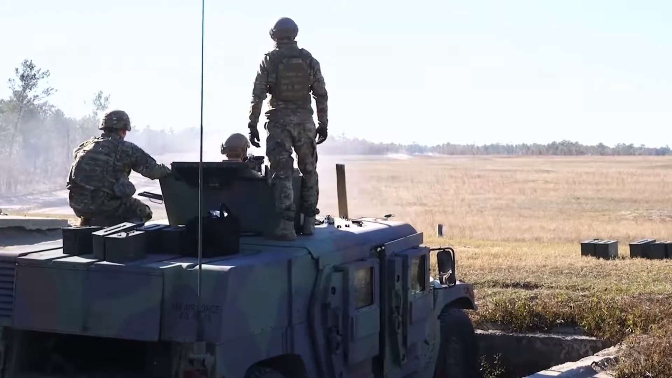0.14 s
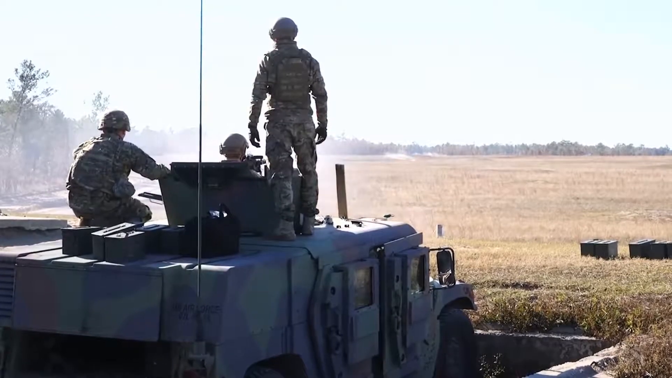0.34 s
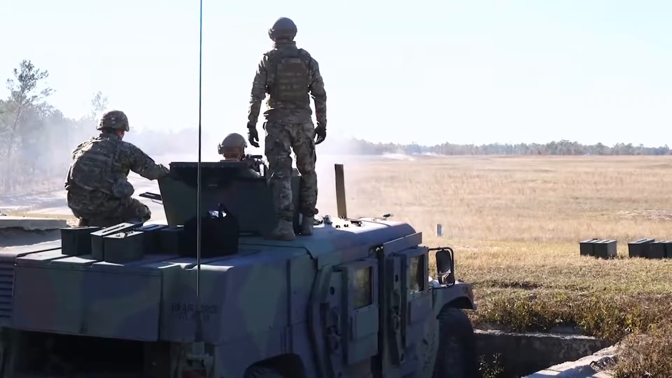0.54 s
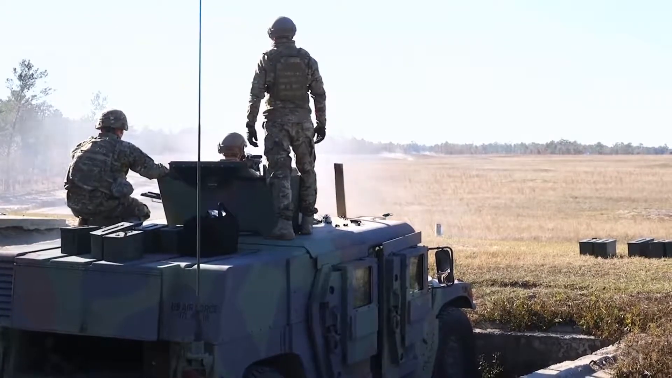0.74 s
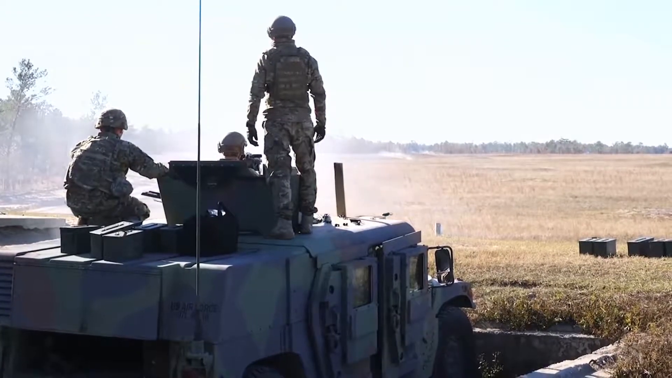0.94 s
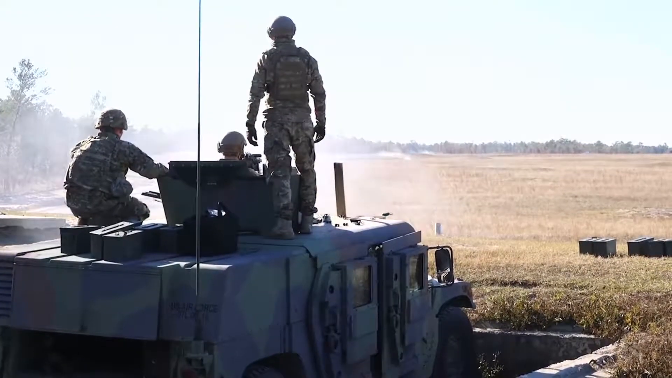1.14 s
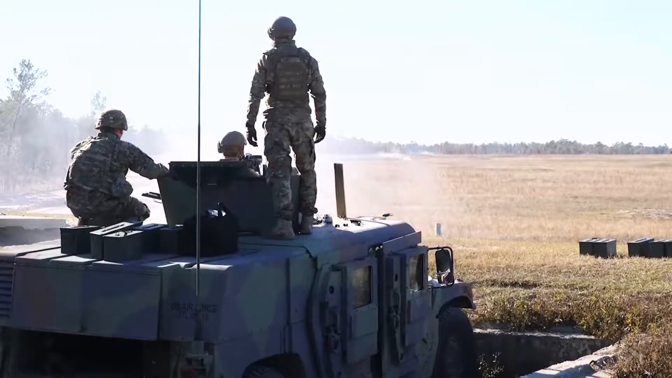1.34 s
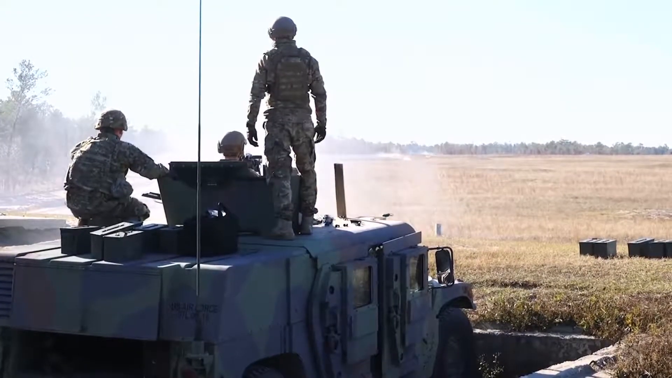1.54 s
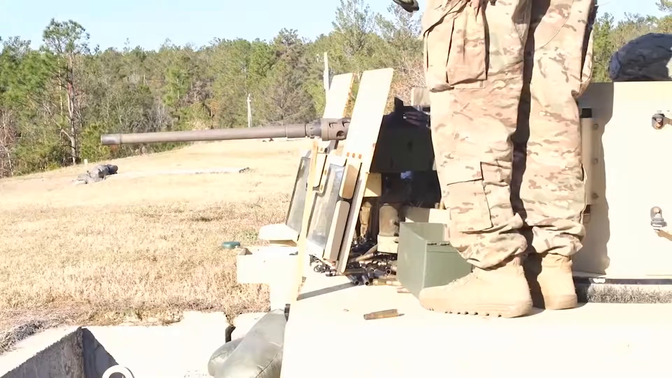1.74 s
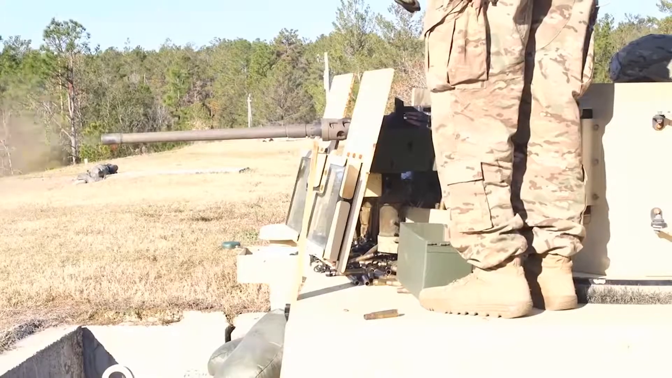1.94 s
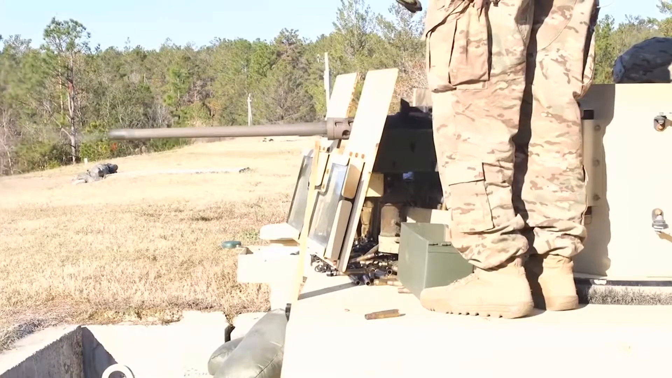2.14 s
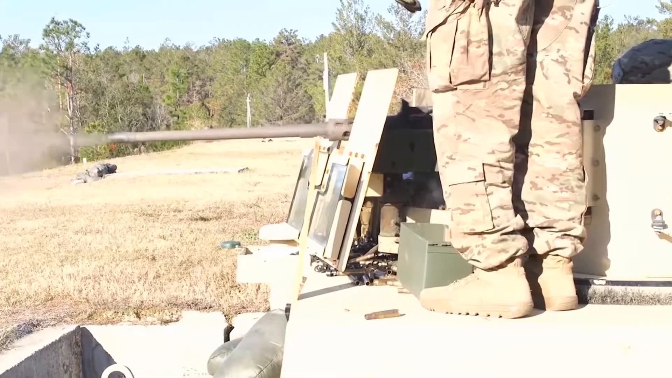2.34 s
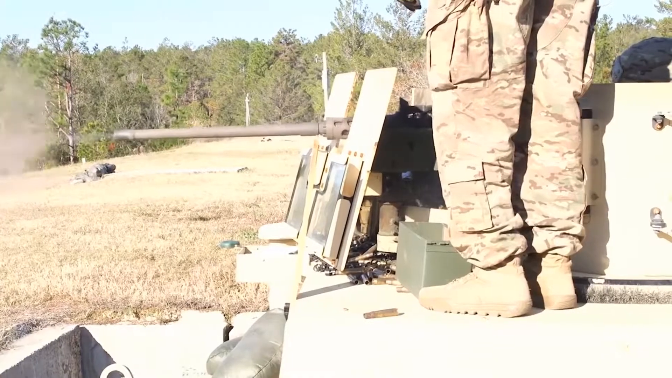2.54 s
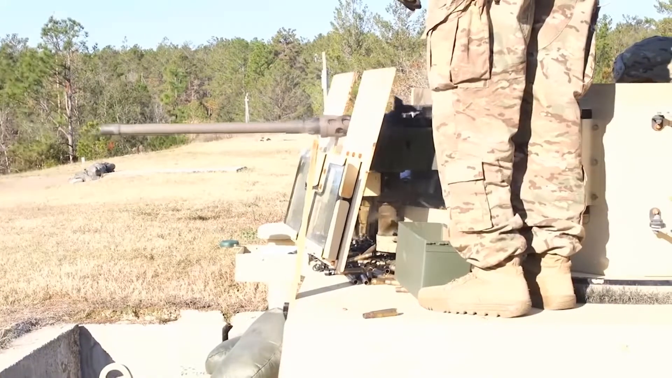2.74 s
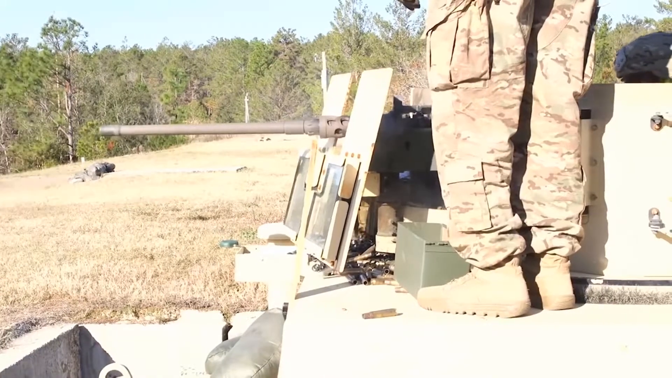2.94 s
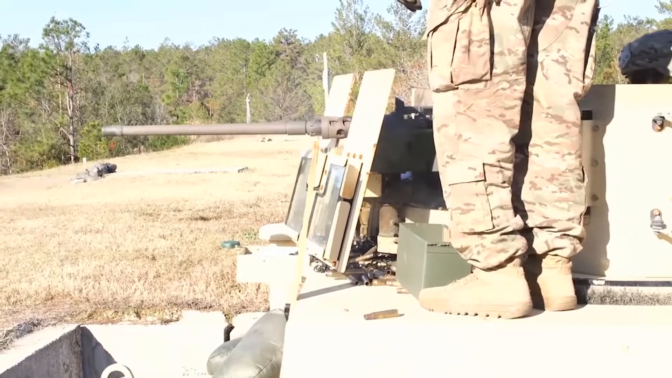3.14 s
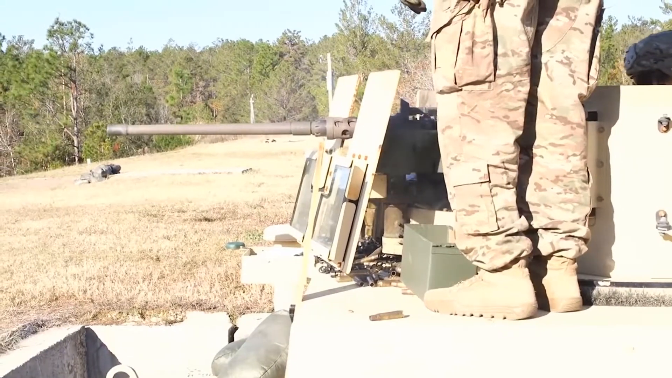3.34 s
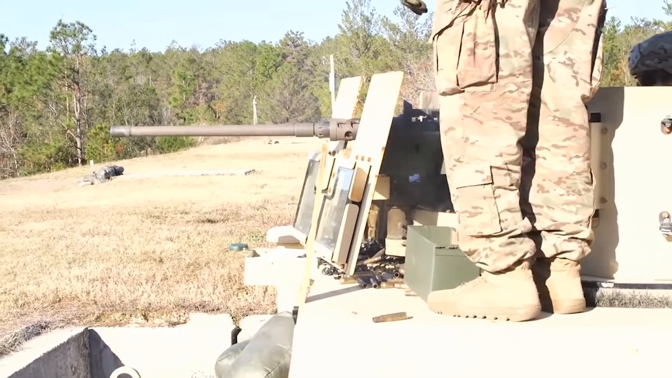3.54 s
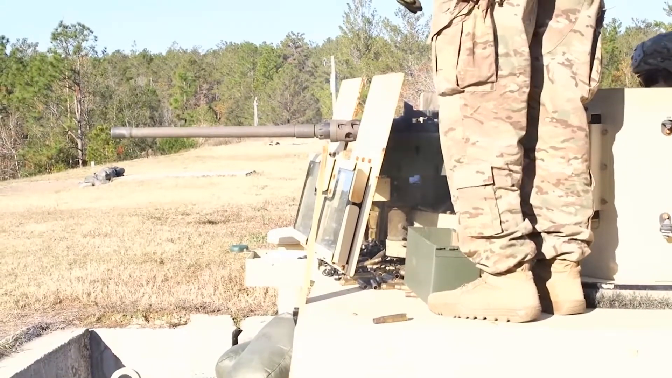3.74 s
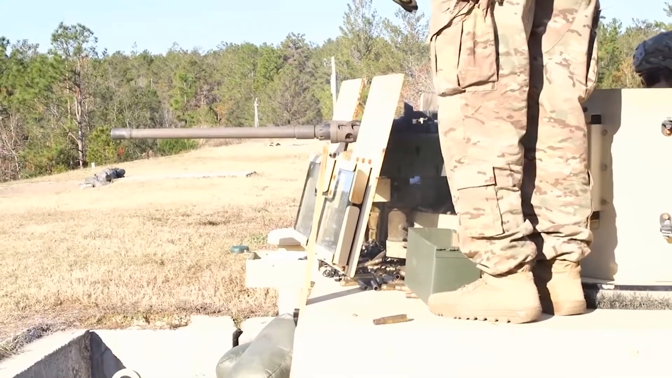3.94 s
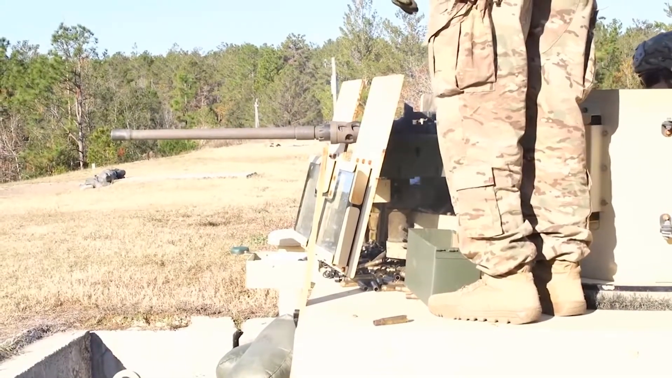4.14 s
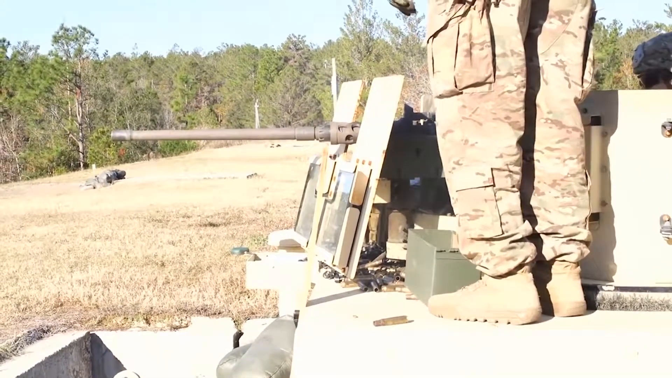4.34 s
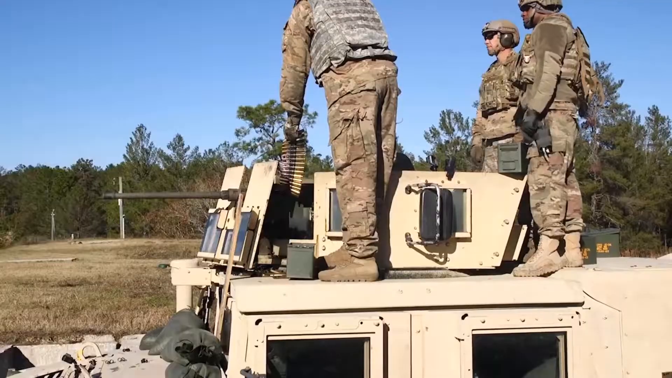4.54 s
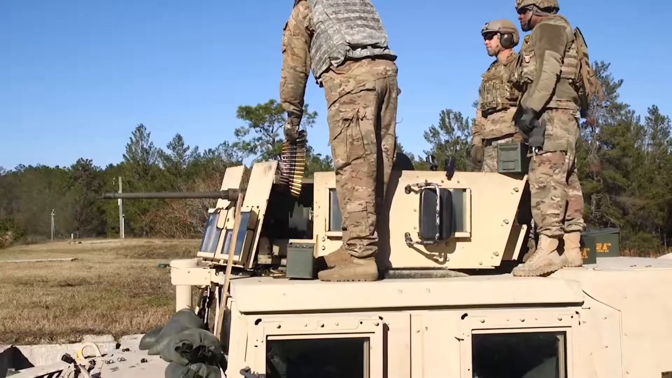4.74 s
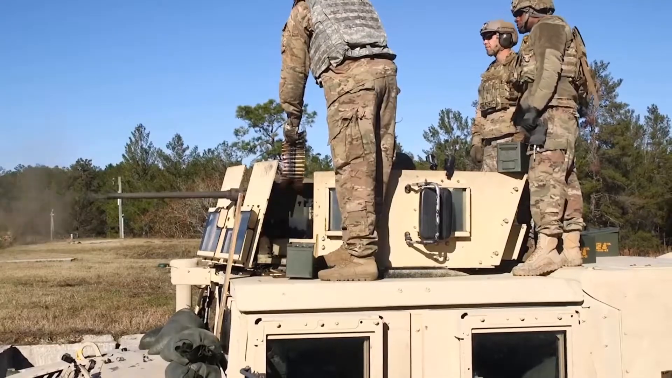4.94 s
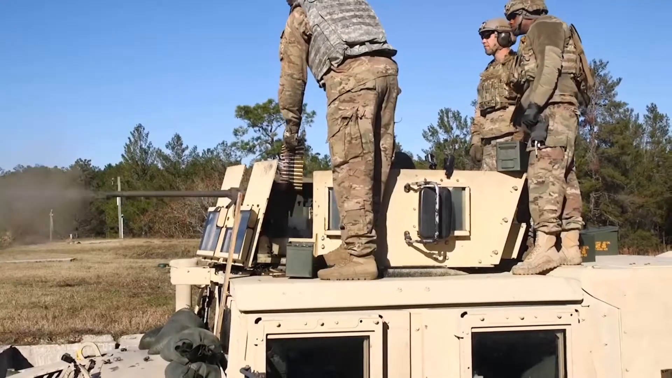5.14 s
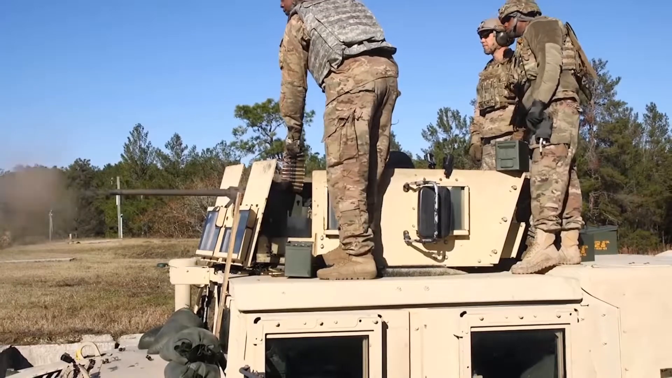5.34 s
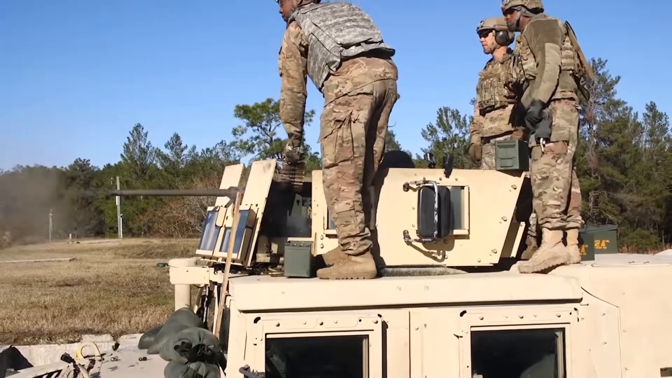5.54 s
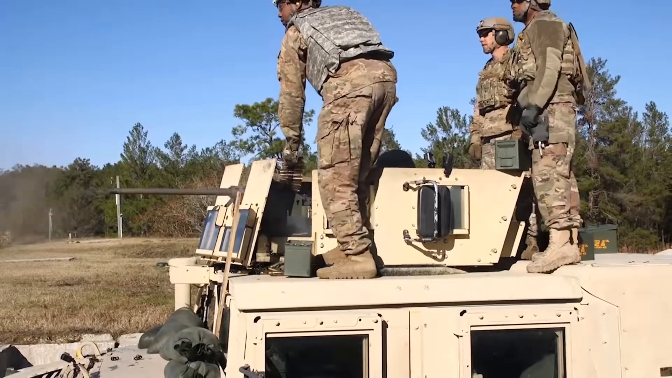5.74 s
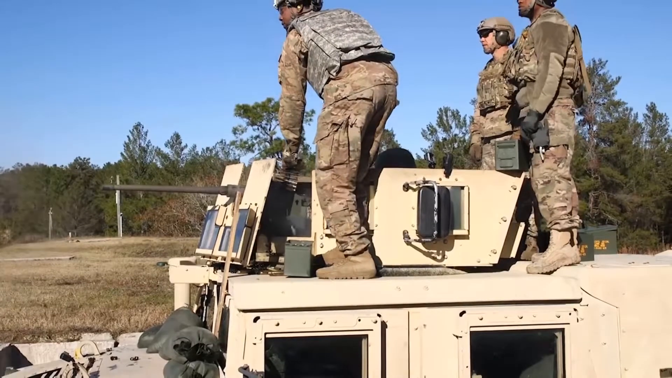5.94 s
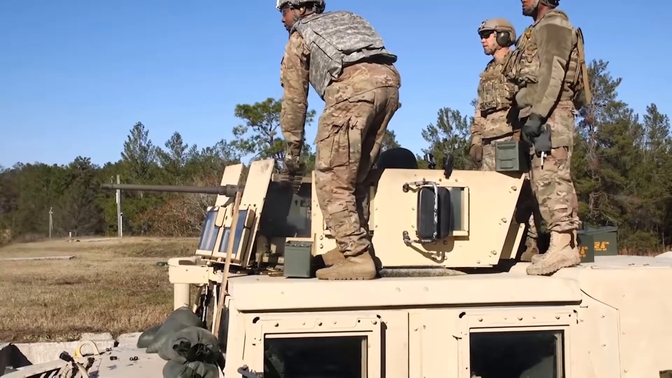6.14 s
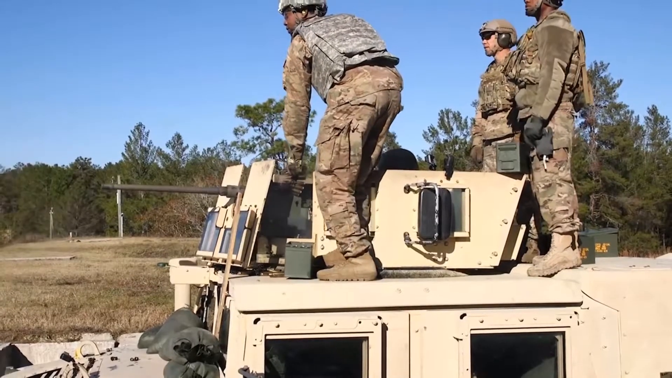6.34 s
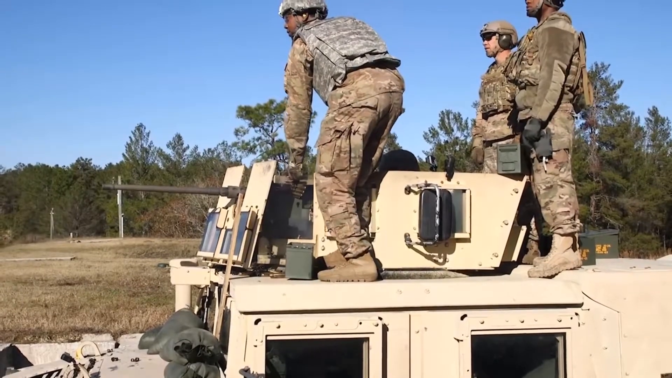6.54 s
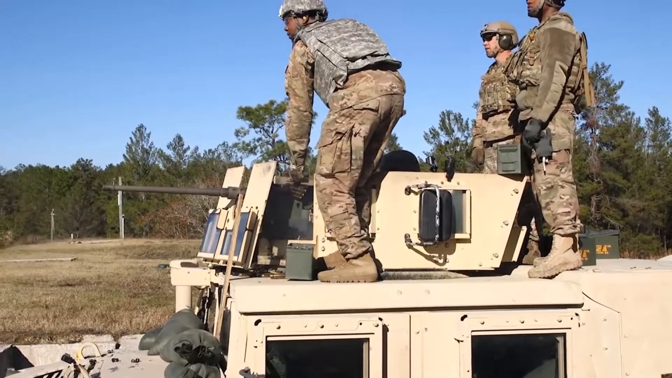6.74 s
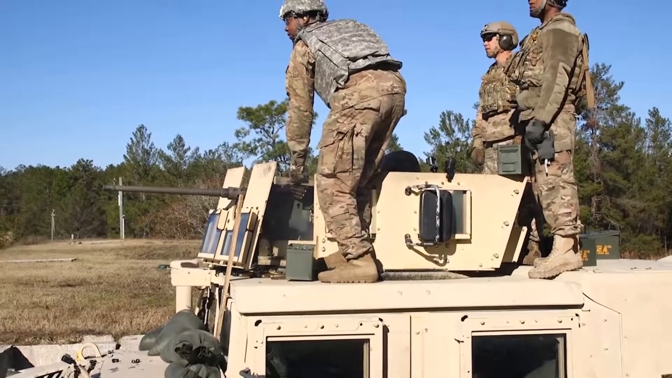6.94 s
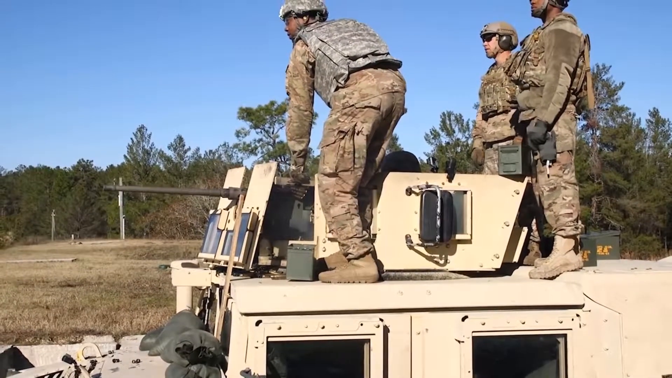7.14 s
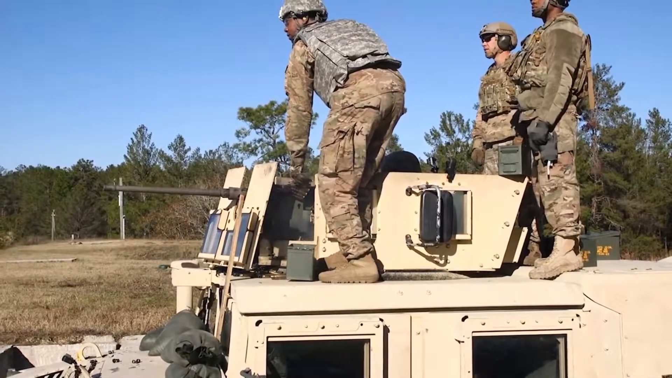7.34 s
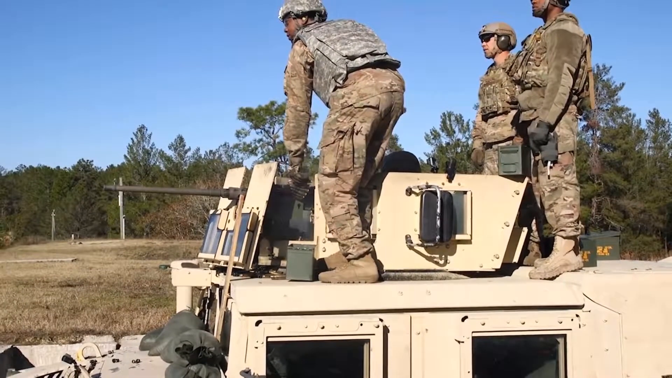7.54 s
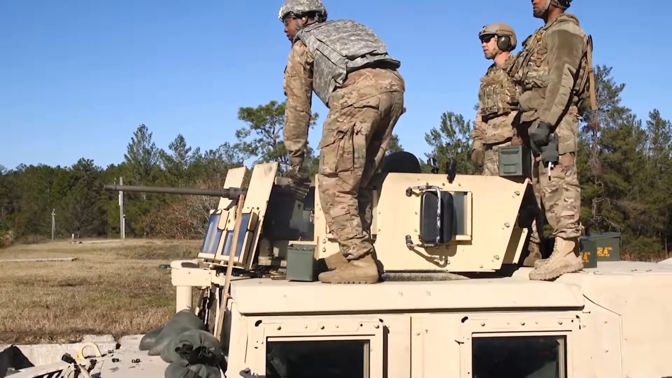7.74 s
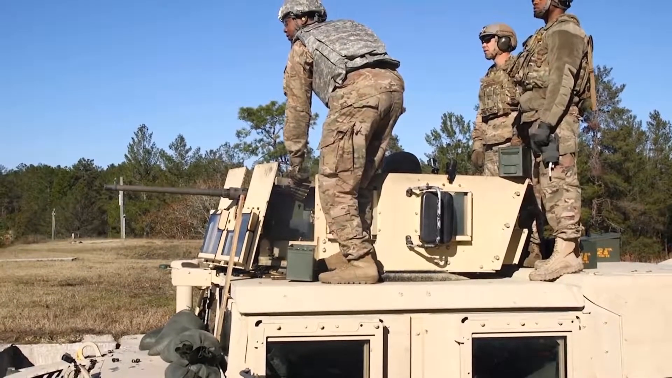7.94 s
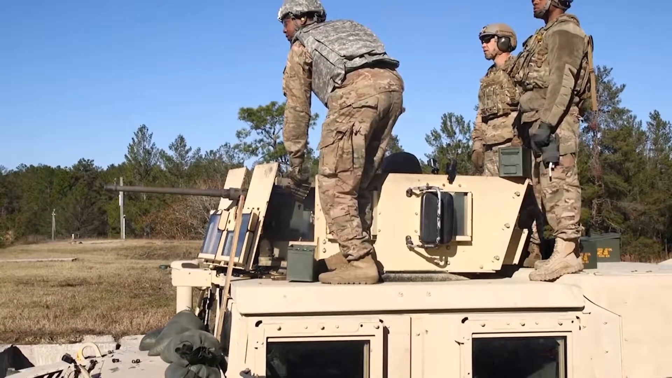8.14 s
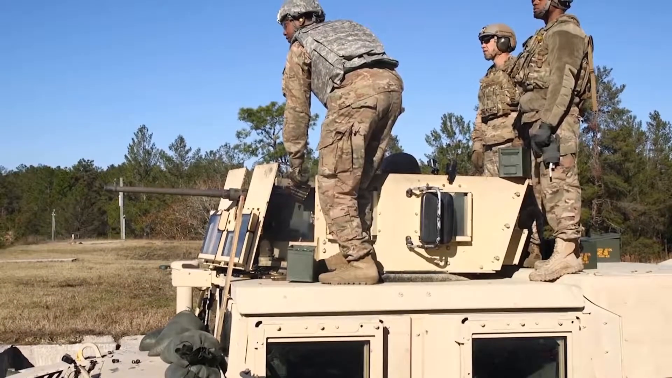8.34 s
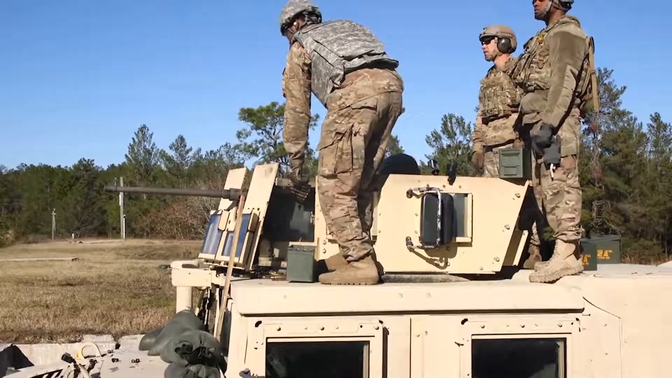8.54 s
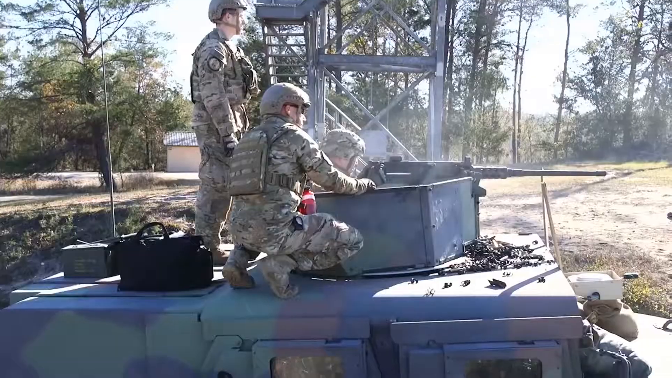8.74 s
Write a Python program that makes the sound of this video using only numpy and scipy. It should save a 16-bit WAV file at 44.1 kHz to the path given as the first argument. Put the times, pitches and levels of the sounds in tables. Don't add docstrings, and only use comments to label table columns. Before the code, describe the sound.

Four overloaded heavy machine-gun bursts on an open range, echoes rolling off trees, with links sliding and brass cases ringing on a steel roof between.

```python
import sys
import numpy as np
from scipy import signal
from scipy.fft import rfft, irfft, next_fast_len
from scipy.io import wavfile
from scipy.ndimage import uniform_filter1d

SR = 44100
rng = np.random.default_rng(int(sys.argv[2]) if len(sys.argv) > 2 else 0)


def master_out(mix):
    frames = np.transpose(np.atleast_2d(mix))
    ceiling = np.clip(frames, -1, 1)
    pcm = np.round(ceiling * 32767).astype(np.int16)
    wavfile.write(sys.argv[1], SR, pcm)


def field_ratio(decibels):
    return 10 ** (np.asarray(decibels, dtype=float) / 20)


N = 391608
STEP = 16
EDGES = 22 * 2 ** np.arange(0, 9.6, .5)

# start in seconds, end in seconds.
SPOT_TIMES = [
    (-.32, 1.739),
    (1.75, 4.473),
    (4.478, 7.467),
    (7.478, 8.668),
]


def at_hz(points, hz):
    table = np.array(points)
    return np.interp(np.log(hz), np.log(table[:, 0]), table[:, 1])


def one_pole(x, steps):
    return signal.lfilter([1], [1, -np.exp(-1 / max(steps, .01))], x + 1e-30)


def drift(count, steps):
    white = rng.standard_normal(count + 4000)
    slow = one_pole(one_pole(white, steps), steps)[4000:]
    return slow / slow.std()


def lowpass(x, hz):
    return signal.sosfilt(signal.butter(2, hz, fs=SR, output="sos"), x)


def bands(white):
    for k, (low, high) in enumerate(zip(EDGES, EDGES[1:])):
        band = signal.butter(2, [low, high], "band", fs=SR, output="sos")
        yield np.sqrt(low * high), signal.sosfilt(band, white[k % 2])


def stereo(mid, side, alike):
    return np.sqrt((1 + alike) / 2) * mid + np.sqrt((1 - alike) / 2) * side * [[1], [-1]]


def coloured(count, spectrum, alike):
    white = rng.standard_normal((2, 2, count))
    out = sum(field_ratio(at_hz(spectrum, hz)) * stereo(*noise, alike) for hz, noise in bands(white))
    return out / out.std()


def ring(clicks, hz, t60):
    r, w = field_ratio(-60 / (t60 * SR)), 2 * np.pi * hz / SR
    return signal.lfilter([0, np.sin(w)], [1, -2 * r * np.cos(w), r * r], clicks + 1e-18)


def boom(booms, count, alike):
    click = np.arange(count) == 0
    rings = []
    for delay_s, hz, level_db, t60 in booms:
        knock = field_ratio(level_db) * lowpass(ring(click, hz, t60), 2.53 * hz)
        rings.append(np.roll(knock, round(delay_s * SR)))
    rings = np.array(rings)
    mixed_signs = rings[::2].sum(axis=0) - rings[1::2].sum(axis=0)
    return stereo(rings.sum(axis=0), mixed_signs, -alike) * [[1], [-1]]


def arrivals(trains, paths, hz):
    power, rate = np.zeros(trains.shape), SR / STEP
    rise = 0.73 / hz * rate
    for delay_s, level_db, t60, centre_hz, narrowing_db in paths:
        lag, octaves = round(delay_s * rate), np.log2(hz / centre_hz)
        loss_db = 60 / t60 + 1.5 * (hz / 1000) ** 1.2
        fall = rate * 10 / np.log(10) / loss_db
        gain = field_ratio(2 * (level_db - abs(narrowing_db) * octaves ** 2))
        blur = 0.006 * lag + 1.2
        echo = one_pole(one_pole(trains, fall), blur) * (1 - np.exp(-1 / blur))
        power[:, lag:] += gain * echo[:, :power.shape[1] - lag]
    swelling = one_pole(power, rise) * (1 - np.exp(-1 / rise))
    return np.repeat(np.sqrt(swelling), STEP, axis=1)


def shaded(right, lead, bass_db, treble_db):
    size = next_fast_len(len(right))
    hz = np.arange(size // 2 + 1) * SR / size
    bass_loss_db = bass_db / (1 + (hz / 90) ** 2)
    treble_loss_db = treble_db / (1 + (9000 / (hz + 1)) ** 2)
    turn = np.exp(2j * np.pi * hz * lead / SR)
    return irfft(rfft(right, size) * field_ratio(-bass_loss_db - treble_loss_db) * turn, size)[:len(right)]


# frequency in Hz, share alike in every shot.
REPEATS = [(100, 0.96), (400, 0.85), (1200, 0.45), (4000, 0.34), (12000, .05)]
# frequency in Hz, share of the bass likeness left.
WIDENING = [(300, 0.81), (1400, 0.55), (3500, 0.13), (15000, .01)]
# frequency in Hz, level in dB per Hz.
GRIT = [(30, -10.5), (500, 0), (2000, -8), (6000, -7.5), (15000, -18)]
# overdrive left and right in dB, ceiling left and right in dB.
OVERLOAD = [(12.5, 2.5, -13, -25.5), (17.5, 6.5, -20.5, -18), (16.5, 8.5, -20.5, -20), (13, 4, -20, -16.5)]
# bass likeness left-right, grit in dB, lumpiness of the echo in dB.
SPACES = [(-.95, -11, 3), (-0.61, -5, 3), (-0.59, -5.5, 2), (0.087, -21, 1)]
# lead in samples, bass loss in dB, treble loss in dB.
RIGHT_SIDE = [(6.5, 2, 2.5), (9.0, 5.5, 2.5), (7.5, 5.5, 3), (-6.0, 1, 8.5)]
# delay in seconds, frequency in Hz, level in dB, t60 in seconds.
WALLS = [
    [(.139, 332, -8.5, 0.061), (.194, 415.6, -9.5, .04), (.254, 324, -10, 0.044), (.39, 288, -18.5, 0.063),
     (.438, 1610, -17.5, .004)],
    [(.185, 539, -13.5, 0.042), (.208, 460, -11.5, 0.055)],
    [(.176, 548, -11.5, 0.05), (.197, 496, -3.5, .045), (.17, 780, -19, 0.049), (.18, 430, -10.5, .05),
     (.088, 303, -5, 0.04)],
    [(.0755, 595, -18, 0.067), (.0755, 1164, -19.5, 0.044), (.203, 350, -25, 0.04), (.207, 900, -22, .02),
     (.26, 300, -26, .04), (.424, 300, -24, .03)],
]


def burst(spot, shots, paths, hulls, blast):
    start_s, end_s = SPOT_TIMES[spot]
    bass_alike, grit_db, lumpy_db = SPACES[spot]
    count = round((end_s - start_s) * SR) // STEP * STEP
    at = [round((s - start_s) * SR) for s, peak_db in shots]
    strength = field_ratio(.5 * (np.array(shots)[:, 1] + 14))
    trains = np.zeros((2, count // STEP))
    trains[0, 0] = 1
    trains[1, np.array(at) // STEP] = strength ** 2
    single, fresh, total = 0, 0, 0
    lumps = drift(count // STEP, 23.0)
    for hz, noise in bands(rng.standard_normal((2, 4, count))):
        gain, same = field_ratio(at_hz(blast, hz)), at_hz(REPEATS, hz)
        alike = bass_alike * at_hz(WIDENING, hz)
        one, many = gain * arrivals(trains, paths, hz)
        band_lumps = 0.97 * lumps + 0.6 * drift(count // STEP, 29.0)
        many = many * np.repeat(field_ratio(lumpy_db * band_lumps), STEP)
        single = single + np.sqrt(same) * one * stereo(noise[0], noise[1], alike)
        fresh = fresh + np.sqrt(1 - same) * many * stereo(noise[2], noise[3], alike)
        total += gain ** 2 * hz / SR
    single = single / np.sqrt(total) + boom(hulls + WALLS[spot], count, bass_alike)
    fresh = fresh / np.sqrt(total)
    for i, size in zip(at, strength):
        fresh[:, i:] += size * single[:, :count - i]

    drive, ceiling = field_ratio(np.reshape(OVERLOAD[spot], (2, 2, 1)))
    pressure = drive * fresh
    sound = ceiling * pressure / (1 + np.abs(pressure) ** 4.22) ** (1 / 4.27)
    excess = uniform_filter1d(np.tanh(.5 * np.abs(pressure)) ** 2, size=500, axis=1)
    sound = sound + ceiling * field_ratio(grit_db) * excess * coloured(count, GRIT, alike=0)
    sound = np.array([sound[0], shaded(sound[1], *RIGHT_SIDE[spot])])
    sound *= np.minimum(np.arange(count)[::-1] / 200, 1)
    out, first = np.zeros((2, N)), round(start_s * SR)
    out[:, max(first, 0):first + count] = sound[:, max(-first, 0):]
    return out


# time in seconds, peak in dB.
EARLIER_SHOTS = [(-.31, -16), (-.2, -22), (-.09, -10.5)]
SHOTS_1 = [(0.021, -15.5), (0.134, -14), (0.2424, -14.5), (0.3528, -19), (0.4614, -14.5), (0.5705, -15),
           (0.6801, -14.5), (0.7912, -15), (0.9061, -12.5), (1.0232, -15), (1.1392, -16.5), (1.2531, -17.5)]
# delay in seconds, level in dB, t60 in seconds, centre in Hz, narrowing in dB per squared octave.
PATHS_1 = [(0, 2, 0.058, 1960, -3), (0.017, 4.5, 0.092, 240, 2), (.024, -18, .088, 1321, 7.5),
           (.058, 0.54, 0.18, 382, 0.7), (.055, -15, .02, 6500, 1.5), (.139, -10.5, 0.15, 150, 5),
           (.193, -10.5, 0.18, 1200, 1.4), (.254, -14.5, 0.29, 269, 5), (.03, -19, 1.77, 1800, 2.5),
           (0.14, -21.5, 1.9, 167, 7)]
# delay in seconds, frequency in Hz, level in dB, t60 in seconds.
HULLS_1 = [(.012, 122, 2, 0.089), (.06, 333.3, -3, 0.18), (.062, 449.8, -2, 0.096), (.064, 569, -3, 0.07)]
# frequency in Hz, level in dB per Hz.
BLAST_1 = [(15, -46), (25, -31.5), (59, -16), (112, 0), (167, -12.5), (213, -1.5), (271, -0.5), (438, 1),
           (1120, -11), (5010, -24), (15000, -30.5)]


def first_burst():
    return burst(0, EARLIER_SHOTS + SHOTS_1, PATHS_1, HULLS_1, BLAST_1)


# time in seconds, level in dB, settling in seconds.
HEAPS = [(1.42, -50, 0.48), (2.801, -42, 0.11), (2.976, -49.5, .1), (5.87, -54, 0.12), (5.95, -61, 0.91)]


def heap_slides():
    t = np.arange(N) / SR
    return sum(field_ratio(level_db) * (t > s) * np.exp(-np.abs(t - s) / settle_s) for s, level_db, settle_s in HEAPS)


# frequency in Hz, level in dB.
LINKS = [
    [(5600, -84), (6700, -86), (7190, -82), (8200, -86), (8580, -90), (10430, -80), (10910, -82),
     (12355, -86), (12890, -92), (13830, -88), (14800, -90)],
    [(5980, -70), (6385, -68), (7180, -78), (8600, -74), (8760, -74), (10460, -77), (10700, -78),
     (11000, -78), (11340, -69), (11900, -76), (12380, -78), (12830, -79), (13830, -78), (14850, -79)],
    [(5630, -85), (6310, -80), (7190, -89), (8530, -88), (10450, -84), (10940, -87), (11220, -87),
     (12250, -90), (12830, -91), (13780, -88), (14100, -90)],
]
# start in seconds, end in seconds, left level in dB,
# right level in dB, t60 in seconds, spread of pitch as a share.
LINK_SPOTS = [(1.3, 1.739, 59, 41, .15, .005), (2.78, 4.473, 57, 50, .22, .007),
              (5.85, 7.467, 68, 61, .15, .009)]


def links(slides):
    out = np.zeros((2, N))
    touches_per_s = 77
    for modes, (start_s, until_s, left_db, right_db, t60, spread) in zip(LINKS, LINK_SPOTS):
        near = slice(round(start_s * SR), round(until_s * SR))
        count = near.stop - near.start
        for hz, mode_db in modes:
            lumps = field_ratio(3.6 * drift(count // 441 + 1, 12.0))
            lumps = np.repeat(lumps, 441)[:count]
            gains = field_ratio([[mode_db + left_db], [mode_db + right_db]])
            for off, sign in zip(rng.normal(1, spread, size=3), [1, -1, 1]):
                sizes = field_ratio(3.4 * np.minimum(rng.exponential(1, count), 3))
                touches = sizes * (rng.random(count) < touches_per_s / 3 / SR)
                out[:, near] += gains * [[1], [sign]] * ring(touches * lumps * slides[near], hz * off, t60)
        out[:, near] *= np.minimum(np.arange(count)[::-1] / 200, 1)
    return out


# start in seconds, end in seconds, level in dB, drift in dB
AIR = [
    (1.761, 2.024, -87, 7),
    (4.476, 4.831, -59, -13),
    (8.709, 8.88, -65, 9),
]
# frequency in Hz, level in dB per Hz.
AIR_COLOURS = [
    [(15, -30), (25, 3), (106, 3), (273, -16), (453, -3), (650, -10.5), (8000, -28.5), (10400, -49),
     (17600, -120)],
    [(15, -53), (25, -6), (242, -1), (536, -4.5), (590, -4), (682, -10), (980, -5), (8000, -57),
     (10400, -92), (17600, -120)],
    [(15, -34), (25, -19), (60, -7.5), (106, -30.5), (716, -42), (1970, -65.5), (8000, -73), (10400, -95.5),
     (17600, -120)],
]


def air():
    out = np.zeros((2, N))
    for (start_s, until_s, level_db, slope_db), colour in zip(AIR, AIR_COLOURS):
        i = np.arange(round(start_s * SR), min(round((until_s + .3) * SR), N))
        drift_db = slope_db * (np.minimum(i / SR, until_s) - start_s)
        fade_db = -20 * np.maximum(i / SR - until_s, 0)
        gains = field_ratio(level_db + drift_db + fade_db + [[4], [1]])
        out[:, i] += gains * coloured(len(i), colour, alike=-0.1)
    return out


# time in seconds, peak in dB.
SHOTS_2 = [(2.08, -18.5), (2.1942, -13.5), (2.2886, -16.5), (2.3807, -15.5), (2.4755, -17), (2.5703, -16),
           (2.6616, -21.5), (2.7541, -16.5)]
# delay in seconds, level in dB, t60 in seconds, centre in Hz,
# narrowing in dB per squared octave.
PATHS_2 = [(0, -4, 0.16, 16000, 0.06), (0.009, -1.5, 0.18, 449, 0.6), (.012, -1, 0.37, 70, 1),
           (0.071, -18.5, 0.18, 573, 0.058), (.085, -23.5, 0.18, 4900, .5), (.185, -13, 0.14, 520, 4.2),
           (.222, -23.5, .059, 3000, .8), (.1, -38.5, 1.9, 2310, 0.14), (.2, -40, 6.04, 452, 0.7)]
# delay in seconds, frequency in Hz, level in dB, t60 in seconds.
HULLS_2 = [(0.01765, 66, -9, 0.12), (.042, 180, -8, 0.1), (.015, 380, -6, 0.14), (0.014, 500, -16, 0.11)]
# frequency in Hz, level in dB per Hz.
BLAST_2 = [(15, -39), (25, -17.5), (69, -5.5), (128, -2.5), (270, -5.5), (390, -3), (450, -5.5), (691, -9),
           (856, -9), (6540, -22), (15000, -26)]


def second_burst():
    return burst(1, SHOTS_2, PATHS_2, HULLS_2, BLAST_2)


# time in seconds, peak in dB,
# thud minus peak in dB.
LANDINGS = [(3.09, -41, -3), (3.272, -48, 5), (3.345, -44.5, -23), (3.5158, -31.5, -2),
            (3.5515, -35.5, -16), (3.5782, -50, -11), (3.6194, -46.5, 7), (3.6683, -37.5, 3),
            (3.7197, -38, 2), (3.744, -42.5, -15), (3.8279, -41, 5), (3.9, -38.5, 3),
            (3.9256, -48.5, 12.5), (4.079, -39, -29), (4.28, -47.5, 9), (4.3464, -53, -7),
            (4.422, -42, 4),
            (6.2674, -56, 22), (6.3936, -49, -11), (6.5216, -45.5, 8), (6.5996, -45, 0),
              (6.7094, -62, -5), (6.769, -49.5, -5), (6.8193, -57, 2), (6.9416, -43, -6),
              (6.9989, -48.5, 7), (7.1284, -47.5, 1), (7.16, -46, 8)]
# frequency in Hz, level in dB, t60 in seconds, spread among cases as a share.
BRASS = [(4850, -4, 0.13, 0.0118), (5730, -19, 0.14, 0.015), (6200, -8, 0.12, 0.017),
         (6440, -1.5, 0.17, 0.00695), (6760, -15, 0.12, .015), (8760, -11, 0.29, 0.012),
         (10620, -17.5, 0.19, 0.007), (11500, -13.5, 0.21, 0.0069), (11800, -12.5, 0.22, .012),
         (12900, -28, 0.13, .012), (14100, -19.5, 0.15, .015), (14840, -10, 0.2, .02)]
# frequency in Hz, level in dB per Hz.
CLATTER = [(60, -15), (200, 2.5), (700, 0.5), (2000, -5), (5000, -20.5), (14000, -34)]


def cases(slides):
    t, touches, thuds = np.arange(N) / SR, np.zeros(N), np.zeros(N)
    for s, peak_db, thud_db in LANDINGS:
        i = round(s * SR)
        touches[i], thuds[i] = field_ratio(peak_db), field_ratio(peak_db + thud_db - 1.5)
    rattle = one_pole(one_pole(touches, 0.029 * SR), 0.002 * SR) / (0.0025 * SR)
    thuds = one_pole(one_pole(thuds, 0.019 * SR), 0.0027 * SR) / (0.0045 * SR)
    rolling = field_ratio(1.5) * slides + field_ratio(-20.5) * one_pole(touches, 0.096 * SR)
    sizes = field_ratio(3.7 * np.minimum(rng.exponential(1, N), 4)) * rng.choice([-1, 1], N)
    touching = rng.random(N) < 260 / SR
    clicks = sizes * touching * (field_ratio(-30.5) * rattle + field_ratio(-18.5) * rolling)

    dealt, rings = rng.integers(0, 7, N), np.zeros((2, N))
    near = slice(round(SPOT_TIMES[1][0] * SR) + SR, round(SPOT_TIMES[2][1] * SR))
    for hz, mode_db, t60, spread in BRASS:
        offsets = np.linspace(-1.5, 1.5, 7) + 0.316 * rng.standard_normal(7)
        for k, off in enumerate(offsets):
            gain = field_ratio(mode_db + 2.0 * rng.standard_normal())
            case = ring((clicks * (dealt == k))[near], hz * (1 + spread * off), t60)
            rings[:, near] += gain * case * [[1], [(-1) ** k]]

    noise = np.tile(coloured(N // 2, CLATTER, alike=-0.7), 2)
    low = lowpass(noise, 1000)
    high = noise - low
    grain = field_ratio(1.1 * drift(N, 49.0))
    clatter = thuds * low / low.std() + field_ratio(-3.5) * rattle * grain * high / high.std()
    second_spot = t < SPOT_TIMES[1][1]
    third_spot = (t > SPOT_TIMES[2][0] + 1) & (t < SPOT_TIMES[2][1])
    return (clatter + rings) * field_ratio([[3], [-5]]) * (second_spot | third_spot)


# time in seconds, peak in dB.
SHOTS_3 = [(4.8935, -22), (5.003, -21.5), (5.1009, -20), (5.195, -20), (5.285, -23), (5.3778, -19.5),
           (5.4689, -19), (5.5653, -19.5), (5.656, -21.5), (5.751, -19.5), (5.845, -21.5)]
# delay in seconds, level in dB, t60 in seconds, centre in Hz,
# narrowing in dB per squared octave.
PATHS_3 = [(0, 2.5, 0.1, 1620, 0.1), (.01, 4.5, 0.18, 398, 0.52), (.02, -2, 0.35, 85, 1.6),
           (0.078, -17, 0.13, 352, 0.14), (0.086, -16.5, 0.072, 4030, .27), (0.172, -14.5, .08, 618, 4),
           (.22, -24, .05, 3000, .8), (.13, -32, 2.54, 330, 0.33), (.2, -44, 7.4, 344, 0.44)]
# delay in seconds, frequency in Hz, level in dB, t60 in seconds.
HULLS_3 = [(0.01393, 65.4, -3.5, 0.22), (0.0149, 147, -7.5, 0.33), (.03, 305, -3.5, 0.19),
           (0.0191, 197, -17, 0.22)]
# frequency in Hz, level in dB per Hz.
BLAST_3 = [(15, -42), (25, -17), (66, -5), (170, -2.5), (215, -5.5), (301, -4.5), (383, -3.5), (543, -5.5),
           (1000, -11.5), (4380, -23.5), (15000, -27.5)]


def third_burst():
    return burst(2, SHOTS_3, PATHS_3, HULLS_3, BLAST_3)


# time in seconds, peak in dB.
SHOTS_4 = [(7.481, -21.5), (7.6086, -22), (7.7263, -22), (7.8323, -21), (7.946, -23), (8.064, -22),
           (8.1793, -21)]
# delay in seconds, level in dB, t60 in seconds, centre in Hz,
# narrowing in dB per squared octave.
PATHS_4 = [(.0003, 2, 0.097, 600, 0.22), (0.026, 4, 0.091, 25000, 0.38), (0.031, -8, 0.074, 290, 0.19),
           (.0745, -7.5, 0.17, 730, 0.8), (.106, -11.5, 0.24, 1300, 0.72), (.092, -18, .06, 3100, 12),
           (0.25, -16.5, 0.047, 480, 1.1), (0.14, -26, 0.09, 300, 0.97), (0.059, -23, 1.68, 180, 4.7),
           (.0041, -22, 3.1, 1900, 2.8)]
# delay in seconds, frequency in Hz, level in dB, t60 in seconds.
HULLS_4 = [(0.00041, 278, -2.5, 0.15), (0.00026, 208.7, 5, 0.077), (0.00067, 127.8, -7.5, 0.13),
           (0.0061, 48, -1, 0.055)]
# frequency in Hz, level in dB per Hz.
BLAST_4 = [(15, -42), (25, -8), (167, -1), (207, -2), (278, -7), (344, -3), (501, -8), (1860, -25.5),
           (2240, -28), (4260, -32.5), (15000, -45)]


def fourth_burst():
    return burst(3, SHOTS_4, PATHS_4, HULLS_4, BLAST_4)


def scene():
    slides = heap_slides()
    guns = first_burst() + second_burst() + third_burst() + fourth_burst()
    return guns + links(slides) + air() + cases(slides)


def band_limit(x):
    return signal.sosfilt(signal.butter(12, 16320, fs=SR, output="sos"), x)


def record(dry):
    presence = signal.butter(1, [2500, 7000], "band", fs=SR, output="sos")
    mix = dry + .5 * signal.sosfilt(presence, dry)
    mix = signal.sosfilt(signal.butter(1, 18, "high", fs=SR, output="sos"), mix)
    mix = signal.sosfilt(signal.cheby2(10, 50, 15700, fs=SR, output="sos"), mix)
    return band_limit(mix)


dry = scene()
out = record(dry)
master_out(out)
```